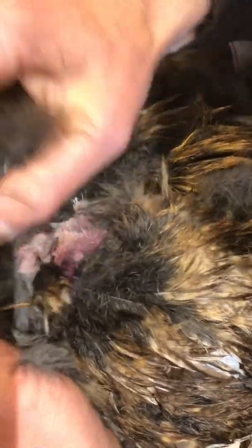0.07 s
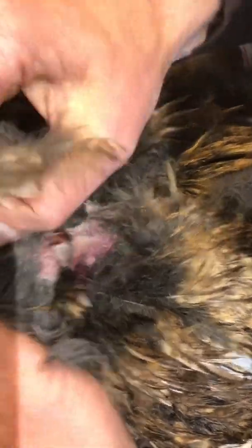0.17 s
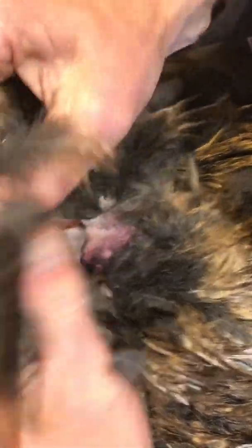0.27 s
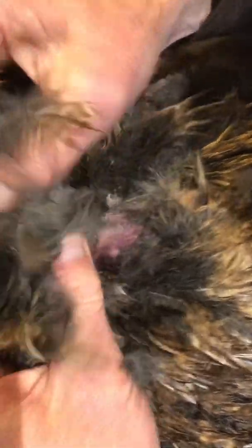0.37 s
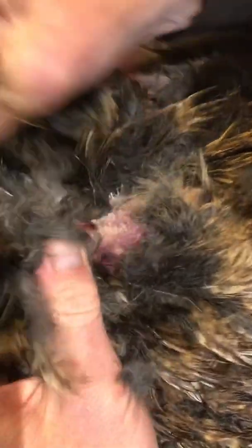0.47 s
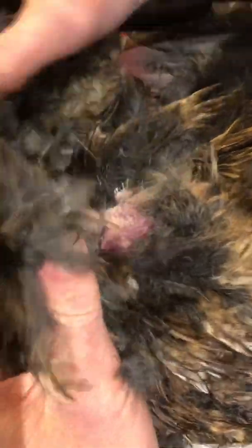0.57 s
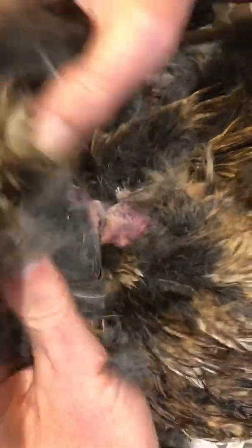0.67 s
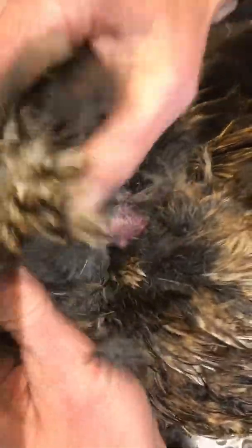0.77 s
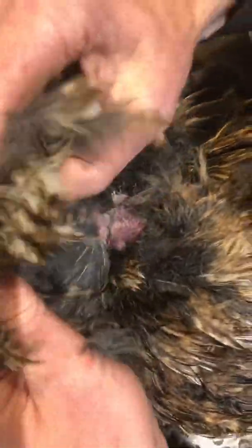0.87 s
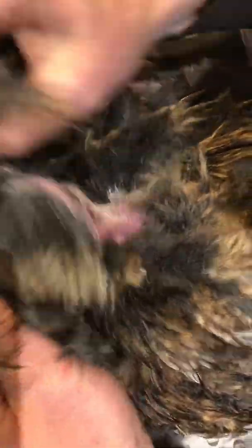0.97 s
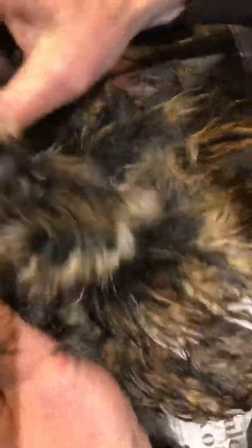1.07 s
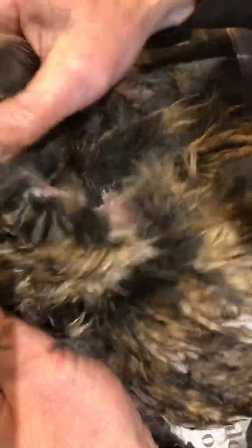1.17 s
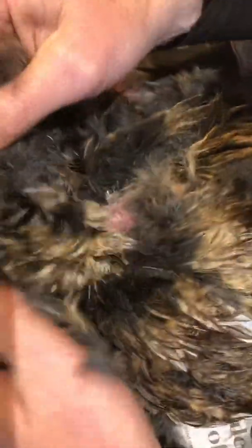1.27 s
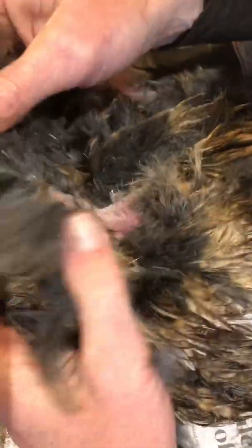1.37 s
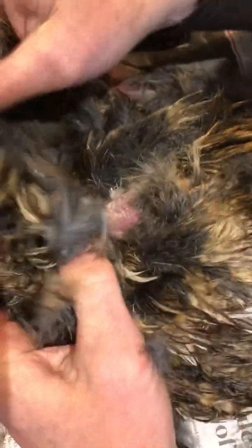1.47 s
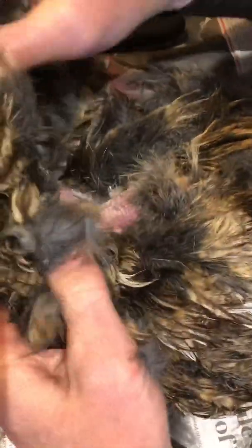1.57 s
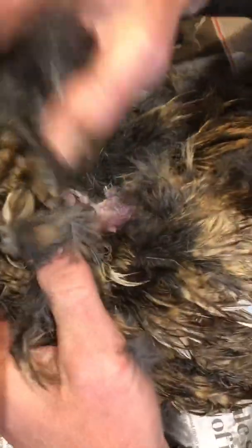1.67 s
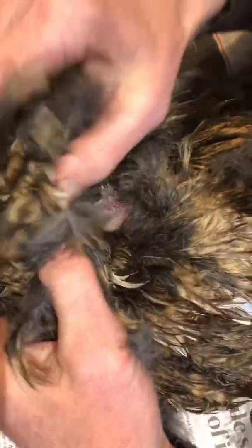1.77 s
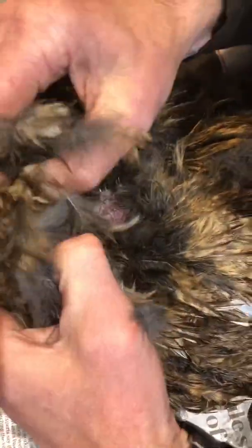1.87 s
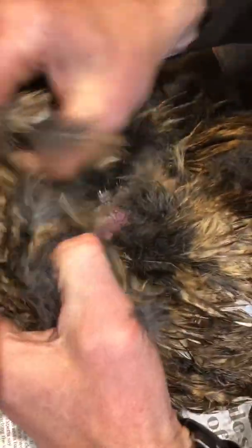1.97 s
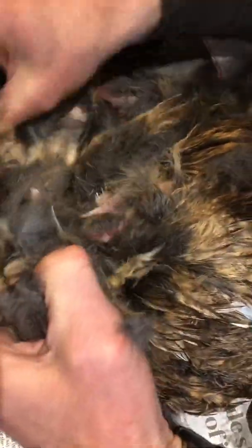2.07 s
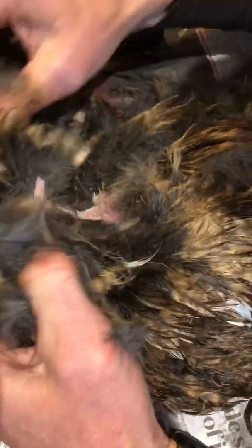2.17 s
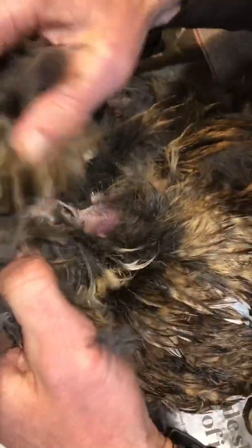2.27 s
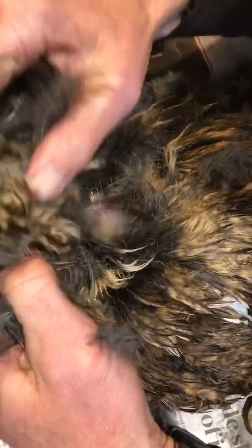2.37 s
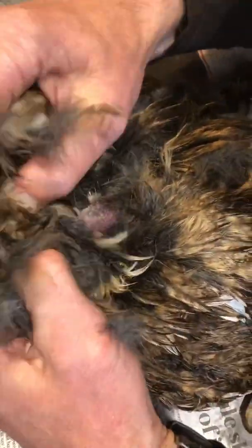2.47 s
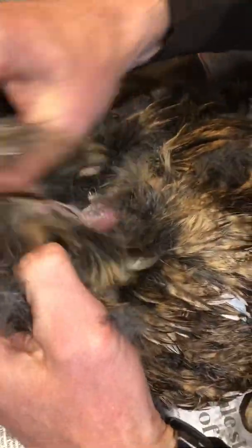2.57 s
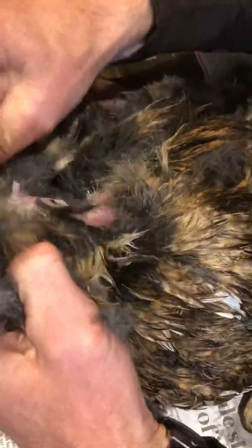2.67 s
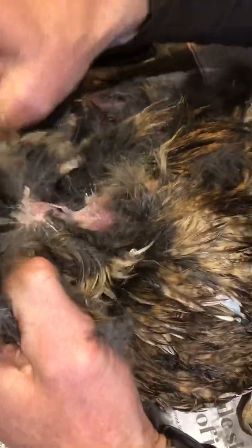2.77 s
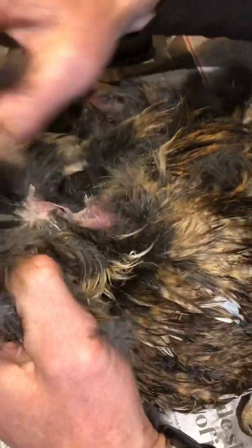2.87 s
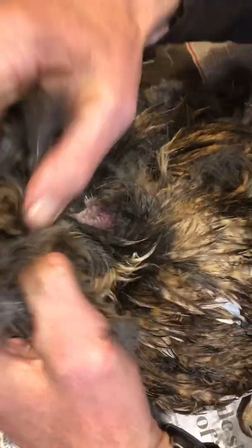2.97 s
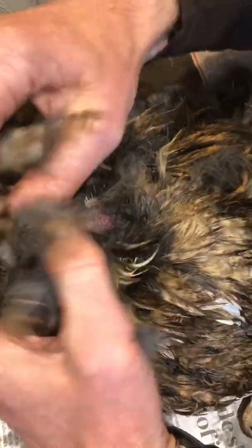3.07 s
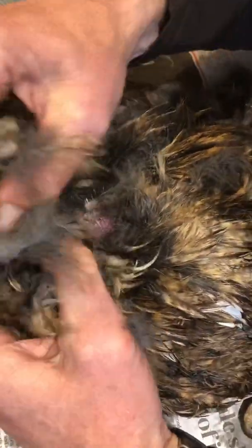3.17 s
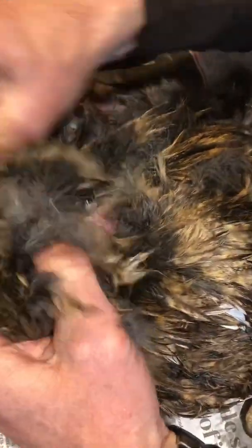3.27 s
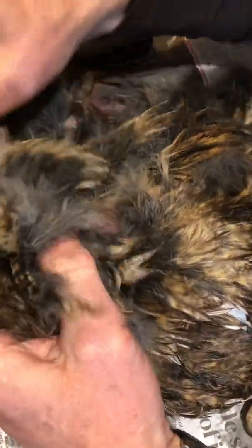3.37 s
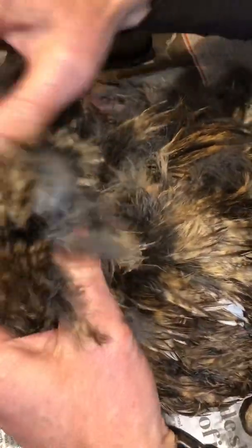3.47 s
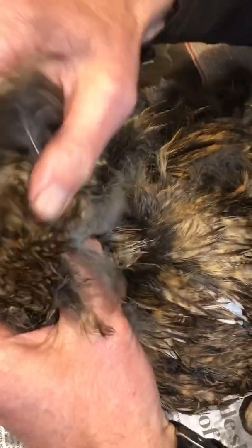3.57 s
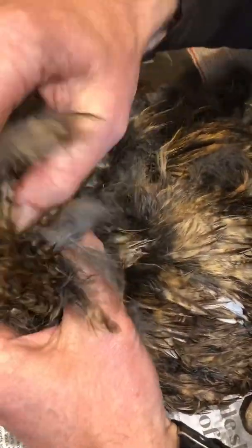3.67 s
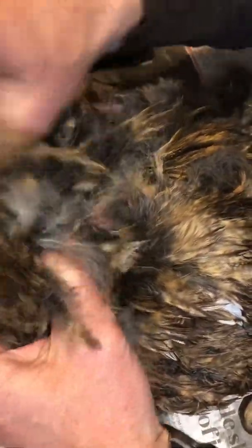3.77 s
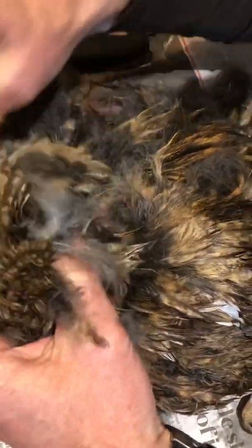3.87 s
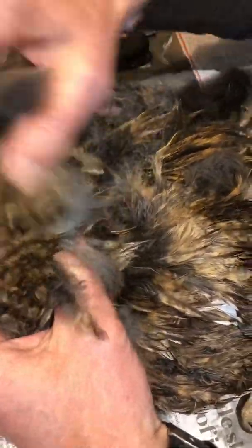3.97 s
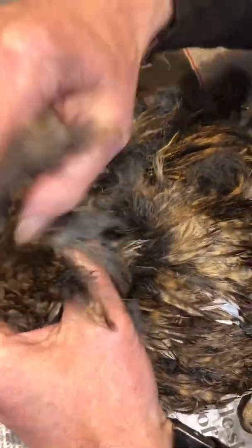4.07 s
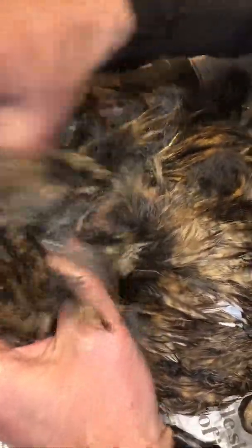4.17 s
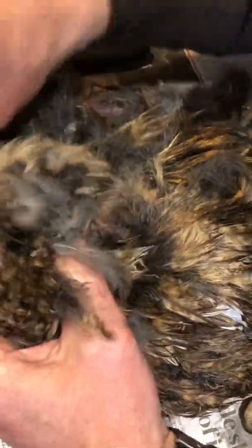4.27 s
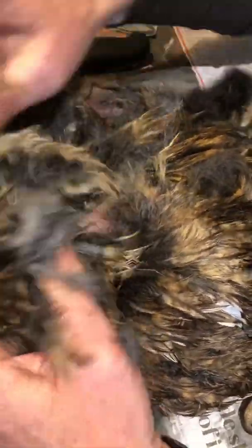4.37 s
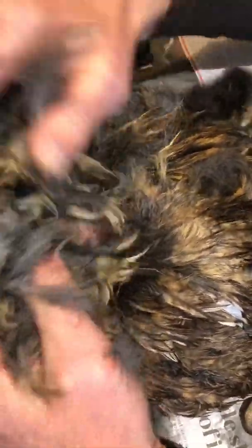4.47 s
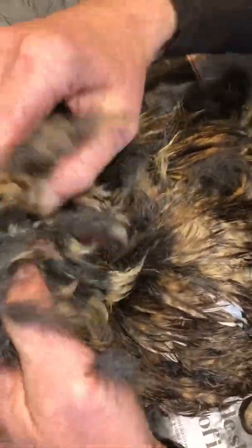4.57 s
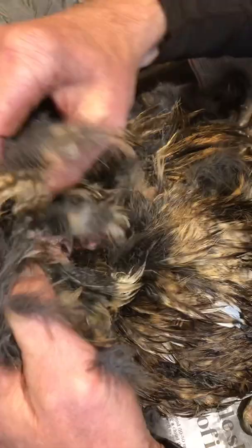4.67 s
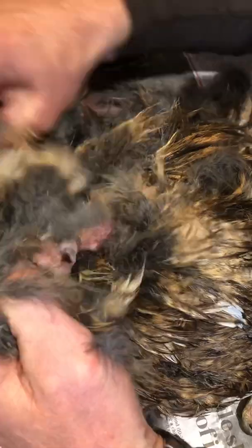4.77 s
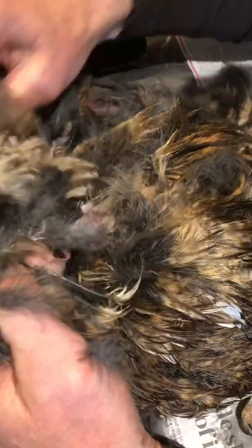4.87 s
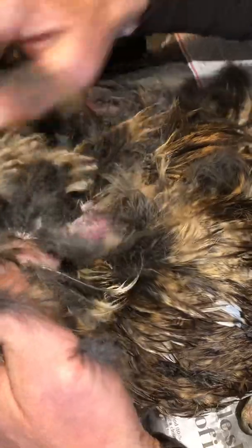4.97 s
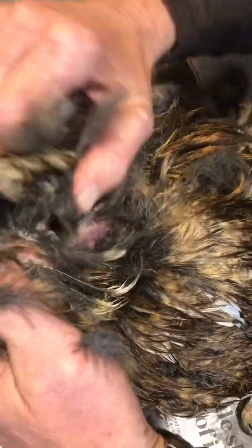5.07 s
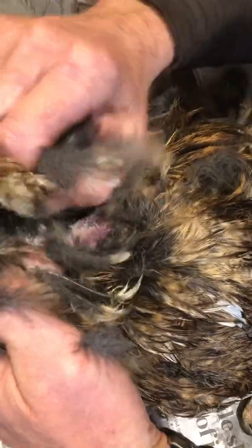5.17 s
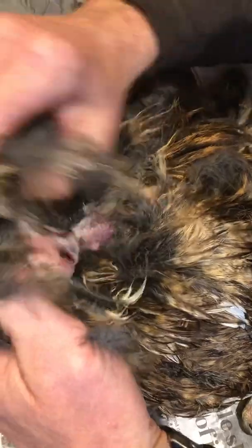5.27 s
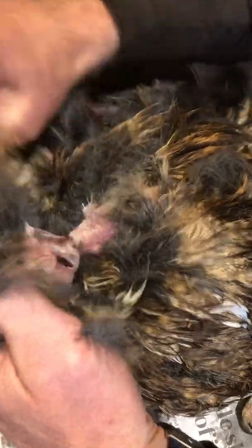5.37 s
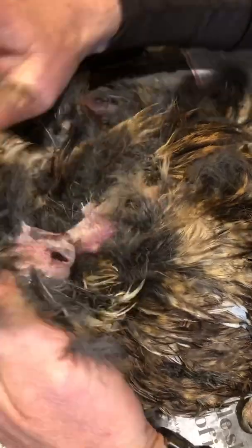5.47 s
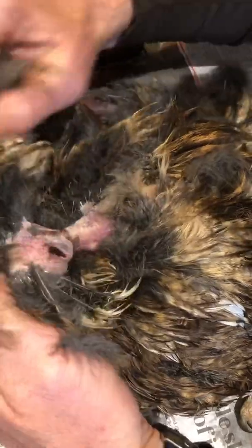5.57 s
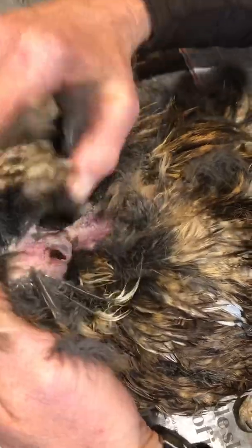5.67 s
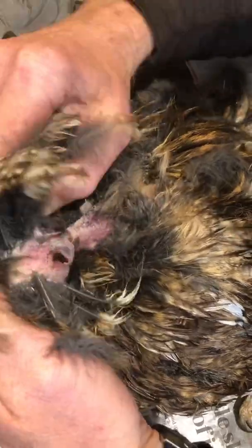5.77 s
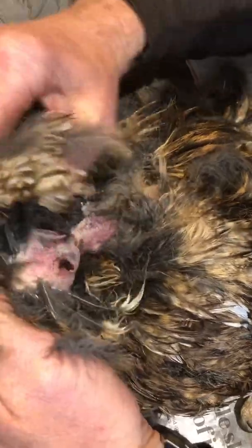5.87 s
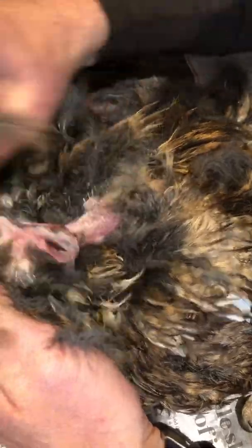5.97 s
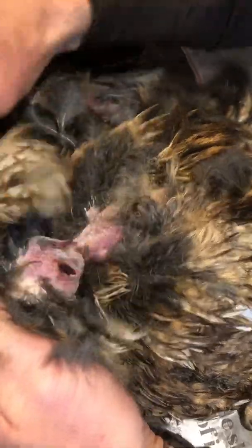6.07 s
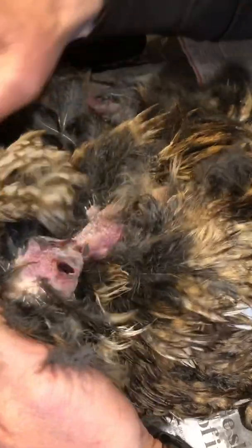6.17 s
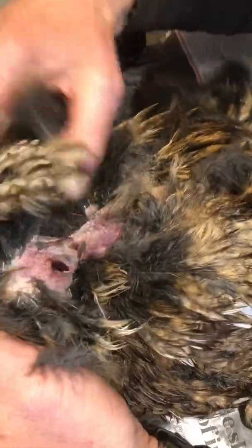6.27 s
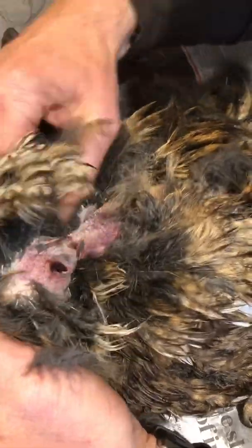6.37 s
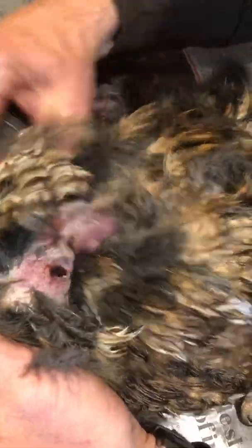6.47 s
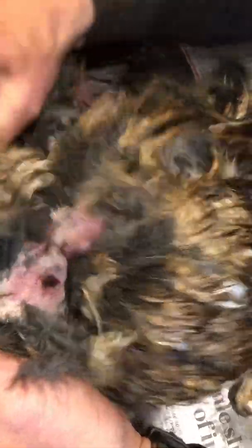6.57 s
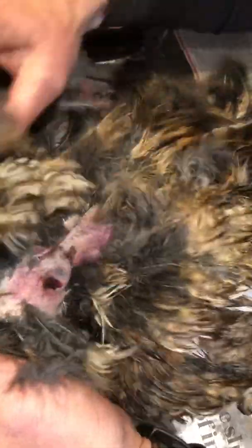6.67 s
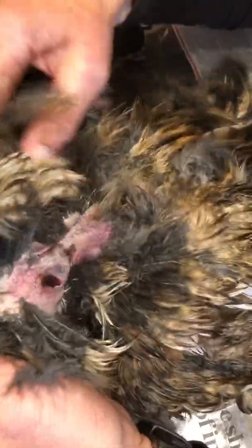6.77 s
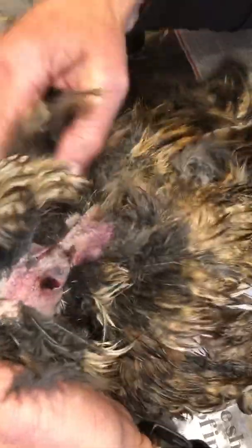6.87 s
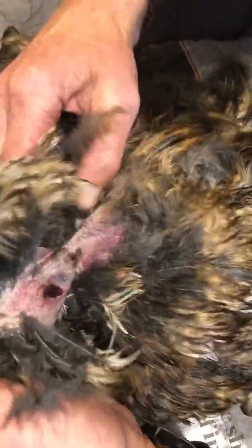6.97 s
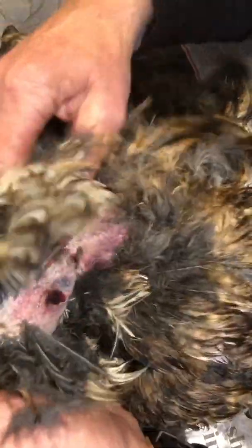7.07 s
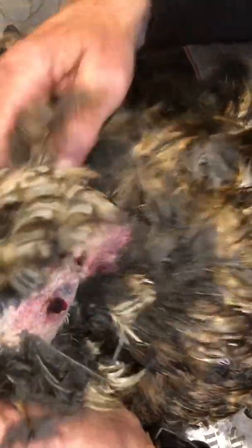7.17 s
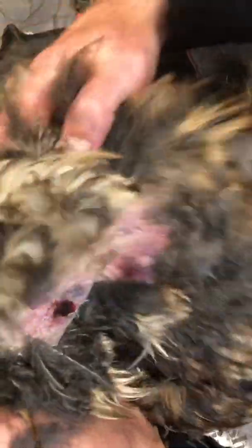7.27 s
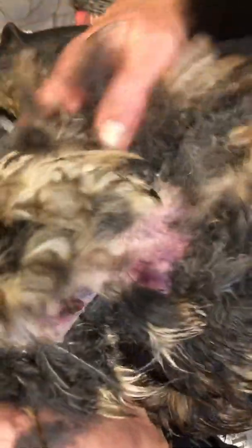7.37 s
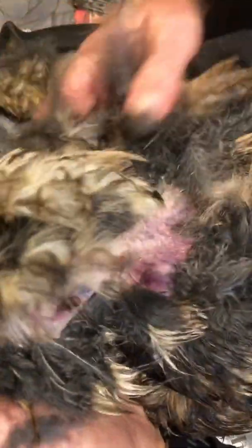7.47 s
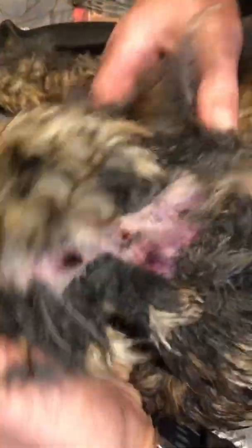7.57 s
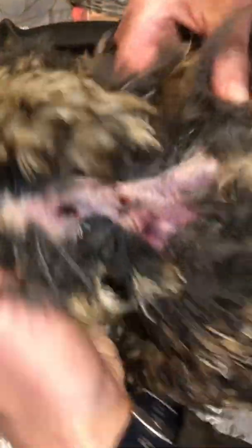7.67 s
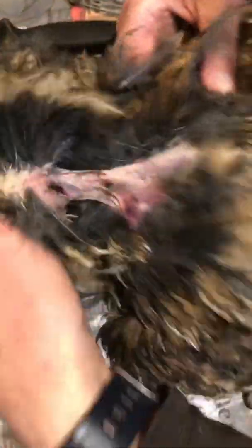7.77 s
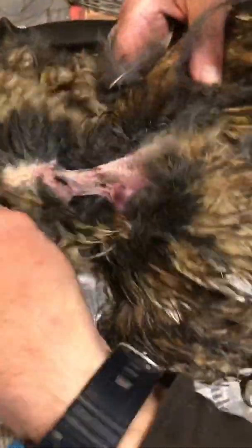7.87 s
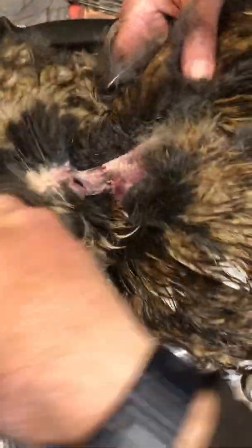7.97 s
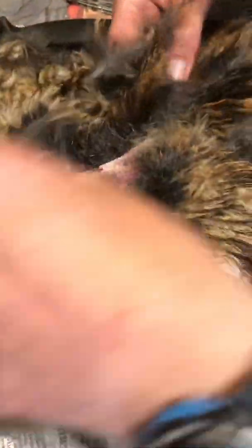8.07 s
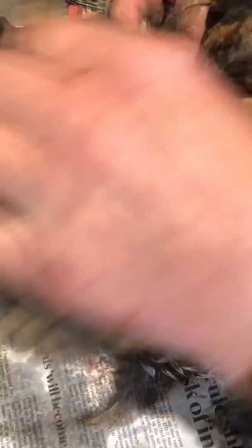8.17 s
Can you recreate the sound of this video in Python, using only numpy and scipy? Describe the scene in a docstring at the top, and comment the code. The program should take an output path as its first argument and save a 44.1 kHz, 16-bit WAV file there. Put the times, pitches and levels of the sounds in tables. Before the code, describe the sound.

Close to the microphone in a small quiet room, fingers rustle through a bird's plumage. Short irregular tugs tear feathers loose with clusters of damped pops, dry snaps and fine crackling down, each with a brief room reflection. Soft bumps come from the surface underneath. The strong pulls thin out after six seconds, the rustling grows fuller, and one dull, low thump lands just before the end.

```python
"""Small quiet room, close by: feathers are plucked by hand from a bird lying on newspaper.
From the start, shaped noise makes air, drone and rumble, and fingers rustle through plumage as patchy noise.
Soon come the tugs: volleys of damped quill pops and snaps, crackling down, dry shaft ticks and a short room answer.
Later the bird nudges the surface, ringing its modes, and near the end it is set down with one dull thump."""
import sys
import numpy as np
from scipy import signal
from scipy.fft import rfft, irfft, next_fast_len
from scipy.io import wavfile
from scipy.ndimage import uniform_filter1d, map_coordinates

SR = 44100
rng = np.random.default_rng(int(sys.argv[2]) if len(sys.argv) > 2 else 0)


def transcribe(u):
    """Save the signal u as a 16-bit wav file named by the first command-line argument.

    u: samples, shape (n,) or (channels, n), limited to [-1, 1]; the rate is SR.
    q: integer samples, one column per channel.
    """
    v = np.clip(np.atleast_2d(u).T, -1, 1)
    q = np.round(v * 32767).astype(np.int16)
    wavfile.write(sys.argv[1], SR, q)


N = 362061
TIME = np.arange(N) / SR
TOP_HZ = 16200  # the recorder's band limit

# All levels in the tables are relative; each source sets its final balance.
# Still air of the quiet room. Each row: frequency in Hz, density in dB per Hz.
AIR_SPECTRUM = [(30, -18.5), (60, 4.5), (290, -9), (400, -15), (800, -15), (1200, -17.5), (2000, -12.5),
                (3000, -23), (5000, -21.5), (7500, -26.5), (10000, -29.5), (16000, -55)]
# Faint low drone. Each row: frequency in Hz, density in dB per Hz.
DRONE_SPECTRUM = [(40, -13.5), (105, 3.5), (180, 1.5), (235, 0), (290, 1.5), (400, -15), (900, -35)]
# Deep rumble. Each row: frequency in Hz, density in dB per Hz.
RUMBLE_SPECTRUM = [(15, -48), (28, 4), (36, 11.5), (43, 9), (60, -14), (100, -37)]
# The rumble swells as each pull ends and then dies away.
RUMBLE_ATTACK_S, RUMBLE_HOLD_S, RUMBLE_RELEASE_S, RESTING_RUMBLE_DB = 0.032, 0.092, 0.13, -70

# Fingers stroking through the plumage. Each row: start in seconds, length in seconds, rubbing level in dB,
# its lean to the treble in dB, barb fizz level in dB, its lean to soft down in dB.
STROKES = [(0.0, 0.063, -61, 0.5, -70, -1), (0.128, 0.15, -64.5, -0.5, -65.5, 3.5),
           (0.634, 0.4, -72.5, 10, -67, 3.5), (0.911, 0.62, -63, 3.5, -70, 1.5),
           (1.605, 0.17, -64.5, 2.5, -65.5, 4.5), (1.98, 0.043, -58.5, 6.5, -78, -9),
           (2.658, 0.065, -66, 4.5, -68, 2), (2.855, 0.47, -72, -1.5, -77, 3),
           (3.329, 0.12, -74, -6.5, -65, 4), (3.738, 0.41, -90, 0, -70.5, 3),
           (4.2, 0.06, -66, 3, -65, -0.5), (4.718, 0.15, -61, -3, -68, -0.5),
           (4.945, 0.31, -72, -1.5, -74, 3.5), (5.313, 0.036, -64.5, 0, -65, -0.5),
           (5.48, 0.26, -63.5, -0.5, -79.5, -5), (5.794, 0.34, -64.5, 0.5, -71, -0.5),
           (6.396, 0.14, -63.5, 2, -67.5, -2), (6.678, 0.3, -69.5, -1.5, -67, 0),
           (7.07, 0.14, -61.5, 2.5, -60.5, 1), (7.278, 0.087, -65.5, -3.5, -76, -5),
           (7.43, 0.12, -60, -1, -60, 1), (7.66, 0.044, -65.5, -3.5, -66, 0),
           (7.741, 0.18, -58.5, -0.5, -58.5, 0), (7.996, 0.18, -57.5, 3.5, -61.5, -0.5)]
STROKE_ATTACK_S, STROKE_RELEASE_S = 0.038, 0.063
STROKE_ARCH_DB = 2.5  # a stroke presses this much harder in its middle than at its ends
RESTING_RUB_DB, RESTING_FIZZ_DB = -75.5, -77.5  # the holding hand never lies quite still
# Fingers rubbing over vanes. Each row: frequency in Hz, density in dB per Hz.
RUB_SPECTRUM = [(180, -47), (300, 0), (415, -4), (787, -4.5), (1180, -9), (1320, -8), (2460, -14.5),
                (4000, -26), (5200, -24), (8800, -120)]
# Barbs flicking past each other. Each row: frequency in Hz, density in dB per Hz.
BARB_SPECTRUM = [(1500, 0), (2500, 1), (3200, -0.5), (4200, 3.5), (6000, -0.5), (7200, 1), (8300, -4),
                 (10500, -7.5), (13000, -9.5), (16000, -14)]

# Each pull of the hand. Each row: start in seconds, length in seconds, small quills level in dB,
# tearing down level in dB, last rip level in dB, rumble level in dB.
TUGS = [(0.298, 0.047, -57, -54, -72, -78), (0.372, 0.01, -57, -61, -44, -79),
        (0.872, 0.028, -57, -69, -72, -78), (1.918, 0.022, -48.5, -39.5, -55, -59),
        (2.073, 0.017, -60, -63, -87, -78), (2.481, 0.041, -38, -43, -61, -68),
        (3.147, 0.041, -45, -49.5, -43, -59), (3.648, 0.052, -56, -52, -59.5, -68),
        (4.071, .029, -43.5, -44.5, -40, -54), (4.62, 0.041, -58, -56.5, -57, -58),
        (5.204, 0.072, -52.5, -53, -71, -59), (5.852, 0.052, -53.5, -61.5, -57, -58.5),
        (6.416, 0.032, -59, -50.5, -58, -64)]
# The big quills, each heard as a pop of its own. Each row: time in seconds, skin pop level in dB,
# nominal pop pitch in Hz, flesh level below 1 kHz in dB, quill snap level in dB.
BIG_QUILLS = [(0.3666, -37, 1810, -42, -46), (0.3717, -37, 1410, -46, -49), (0.38, -30, 1580, -33, -33),
              (0.5143, -47.5, 1900, -51, -60), (0.889, -41.5, 1980, -49, -47),
              (0.9111, -24.5, 1660, -23.5, -37.5), (1.8076, -52, 1470, -56, -69),
              (1.8975, -36, 1450, -43, -50.5), (1.9268, -38.5, 1470, -37, -56),
              (1.9312, -29, 1480, -38, -32), (2.0773, -46, 1980, -67, -54), (2.4813, -33, 1650, -57, -33.5),
              (2.4925, -29, 1440, -40, -49), (2.5044, -47, 1670, -48, -50), (2.5133, -28, 1790, -50, -36),
              (2.5196, -29, 1630, -37, -32), (2.5349, -32, 1130, -31, -42), (2.5473, -38.5, 1460, -37, -43),
              (3.1426, -41, 1780, -57, -40.5), (3.1548, -34, 1610, -32, -30.5),
              (3.1769, -41, 1720, -50, -50), (3.1849, -30.5, 1420, -47, -35.5),
              (3.1958, -28, 1560, -29.5, -29.5), (3.6792, -37.5, 1800, -39.5, -39),
              (4.0601, -34.5, 1550, -47, -34), (4.0702, -26, 1960, -44, -31.5),
              (4.0733, -46, 1500, -44, -27.5), (4.079, -39, 1850, -36, -31),
              (4.0835, -34, 1820, -33.5, -32), (4.097, -33.5, 1580, -43, -33),
              (4.6328, -45, 2210, -67, -50), (5.221, -39, 1900, -39, -46), (5.237, -42.5, 1520, -35, -64),
              (5.2622, -34.5, 1300, -38, -43), (5.5261, -48.5, 1350, -56, -59),
              (5.8551, -37, 1850, -39.5, -48), (5.8813, -37, 1470, -38.5, -51),
              (6.427, -33, 1200, -37.5, -45), (7.1017, -50.5, 1600, -56, -53),
              (7.438, -50.5, 1490, -65, -59), (7.5903, -52, 1640, -48, -66),
              (7.9871, -49, 1770, -55, -51.5)]
# A small quill: nominal pitch, its scatter, flesh and snap against the skin pop, scatter of level.
POP_HZ, POP_OCTAVES, FLESH_DB, SNAP_DB, SCATTER_DB = 1680, 0.39, -10, -5.5, 4.5
# A snapping quill. Each row: frequency in Hz, density in dB per Hz.
SNAP_SPECTRUM = [(300, -35.5), (1500, -5.5), (2300, 4.5), (2900, -21.5), (3700, 0.5), (4600, 0),
                 (6000, -1.5), (7000, -10.5), (8200, -7.5), (10500, -19), (15500, -24.5)]
# Tearing down. Each row: frequency in Hz, density in dB per Hz.
TEAR_SPECTRUM = [(150, 3), (600, 3.5), (1700, 9.5), (2300, 5.0), (2900, -7.5), (4400, 6),
                 (6000, 0), (7500, -5.0), (15000, -19.5)]
# Dry ticks of stiff shafts flicking past the fingers. Each row: time in seconds, level in dB.
TICKS = [(0.303, -52), (1.1255, -52.5), (3.1264, -47.5), (5.4663, -53.5), (5.6433, -60.5), (7.0636, -51),
         (7.6396, -53.5), (7.6765, -46.5)]

# Fading of the room's tail. Each row: frequency in Hz, time to fall 60 dB in seconds.
ROOM_DECAY = [(200, 0.32), (600, 0.25), (1500, 0.31), (4000, 0.33), (10000, 0.28), (16000, 0.19)]
# Colour of the room's answer. Each row: frequency in Hz, gain in dB.
WALL_COLOUR = [(200, 11), (700, 4.5), (1500, -2.5), (2800, 1), (4800, -2.5), (8000, -0.5), (12000, 3)]

# Soft blows on the surface. Each row: time in seconds, level in dB, centre of the push in Hz.
THUMPS = [(1.285, -40, 178), (1.931, -44, 278), (2.518, -47.5, 148), (3.19, -69, 150), (4.691, -54.5, 110),
          (5.291, -53, 100), (5.463, -48.5, 159), (6.755, -42.5, 288), (6.851, -50.5, 190),
          (7.064, -42.5, 212), (7.265, -46.5, 453), (7.285, -46.5, 108), (7.678, -43, 292),
          (7.753, -19, 170)]
# Modes of the surface with its load. Each row: frequency in Hz, level in dB, time to fall 60 dB in seconds.
SURFACE_MODES = [(35.2, -12, 1.4), (108, -2, 0.3), (120.8, -2.5, 0.52), (130.2, -7.5, 0.52),
                 (175.3, -5, 0.42), (187, -7, 0.43), (237.7, -4, 0.164), (278, -4.5, 0.23),
                 (301, -20.5, 1.07), (357, -9, 0.27)]


def amp(db):
    """Decibels to gain."""
    return 10 ** (np.asarray(db) / 20)


def unit(x):
    """Scale to rms 1."""
    return x / np.sqrt(np.mean(x ** 2) + 1e-20)


def along(points, hz):
    """Read (Hz, value) points on a log frequency axis."""
    f, v = np.transpose(points)
    return np.interp(np.log(hz + 1), np.log(f + 1), v)


def wobble(rate):
    """A smooth random curve with rate knots a second."""
    knots = rng.standard_normal(int(N * rate / SR) + 4)
    return map_coordinates(knots, [TIME * rate])


def add(track, s, sound):
    """Mix a sound into the track at time s."""
    part = track[max(round(s * SR), 0):][:len(sound)]
    part += sound[:len(part)]


def filtered(x, response):
    """Multiply the spectrum of x by a response of frequency."""
    m = next_fast_len(N + SR // 4)
    return irfft(rfft(x, m) * response(np.fft.rfftfreq(m, 1 / SR)), m)[:N]


def coloured(x, spectrum):
    """Shape x by the given spectrum, at rms 1."""
    return unit(filtered(x, lambda hz: amp(along(spectrum, hz))))


def lowpassed(x, edge_hz):
    """Dull x above edge_hz."""
    return signal.sosfilt(signal.butter(4, edge_hz, fs=SR, output="sos"), x)


def sized(x):
    """Scale a short sound so that its energy equals rms 1 over 2 ms."""
    return x * np.sqrt(.002 * SR / np.sum(x ** 2))


def impulse(spectrum, size=1024):
    """The causal minimum-phase click that has the given spectrum."""
    cepstrum = irfft(np.log(amp(along(spectrum, np.fft.rfftfreq(size, 1 / SR)))))
    cepstrum[1:size // 2] *= 2
    cepstrum[size // 2 + 1:] = 0
    return irfft(np.exp(rfft(cepstrum)))


def grains(rate, spread_db):
    """Tiny random clicks of uneven size, rate a second on average, at rms 1."""
    sizes = amp(spread_db * np.clip(rng.standard_normal(N), -2, 2))
    signs = rng.choice([-1, 1], N)
    return unit(sizes * signs * (rng.random(N) < rate / SR))


def envelope(s, hold_s, attack_s, release_s):
    """Rise to 1 at time s, hold, and fall away."""
    rise = (np.maximum(s - TIME, 0) / attack_s) ** 2
    fall = np.maximum(TIME - s - hold_s, 0) / release_s
    return np.exp(-rise - fall)


def background():
    """Still room air and a faint low drone as shaped noise, with a rumble that swells as each pull ends."""
    power = amp(RESTING_RUMBLE_DB) ** 2
    for s, length, *_, db in TUGS:
        swell = amp(db) * envelope(s + length, RUMBLE_HOLD_S, RUMBLE_ATTACK_S, RUMBLE_RELEASE_S)
        power = power + swell ** 2
    rumble = np.sqrt(power) * coloured(rng.standard_normal(N), RUMBLE_SPECTRUM)
    air = amp(-68.0) * coloured(rng.standard_normal(N), AIR_SPECTRUM)
    waver_db = 1.8 * wobble(6)
    drone = amp(-68.5 + waver_db) * coloured(rng.standard_normal(N), DRONE_SPECTRUM)
    return air + drone + rumble


def patchy(x, depth_db, size=512):
    """Give x patches of random gain, a few hundred Hz wide and some 25 ms long, at rms 1."""
    z = signal.stft(x, nperseg=size)[2]
    field = uniform_filter1d(rng.standard_normal(z.shape), size=5, axis=0)
    field = uniform_filter1d(field, size=4, axis=1)
    return unit(signal.istft(z * amp(depth_db * unit(field)), nperseg=size)[1][:N])


def stroked(sound, levels_db, leans_db, resting_db, split_hz, wander_db):
    """Swell with each stroke, which has its own balance about split_hz; wander_db sets how far that drifts."""
    high = filtered(sound, lambda hz: 1 / (1 + (split_hz / (hz + 1)) ** 6))
    low_power = high_power = amp(resting_db) ** 2
    for (s, length, *_), db, lean_db in zip(STROKES, levels_db, leans_db):
        arch_db = STROKE_ARCH_DB * (np.sin(np.pi * np.clip((TIME - s) / length, 0, 1)) - .5)
        touch = (amp(arch_db) * envelope(s, length, STROKE_ATTACK_S, STROKE_RELEASE_S)) ** 2
        low_power = low_power + amp(db - lean_db) ** 2 * touch
        high_power = high_power + amp(db + lean_db) ** 2 * touch
    wander = amp(wander_db * wobble(11))
    return np.sqrt(high_power) * high * wander + np.sqrt(low_power) * (sound - high) / wander


def plumage(rub_level_db=-2.5, fizz_level_db=-0.55):
    """In each stroke the fingers rub over the vanes while the barbs flick past each other."""
    _, _, rub_db, treble_db, fizz_db, down_db = np.transpose(STROKES)
    pressure_db = 1.5 * wobble(30)
    # vanes scrape in bands of their own for a moment
    rub = rng.standard_normal(N) + .7 * grains(rate=400, spread_db=5)
    rub = patchy(coloured(rub, RUB_SPECTRUM), depth_db=3.0)
    rub = stroked(rub, rub_db + rub_level_db, treble_db, RESTING_RUB_DB, split_hz=1400, wander_db=1.86)
    # soft down hisses higher than stiff vanes; each stroke has its own balance of the two
    fizz = rng.standard_normal(N) + .6 * grains(rate=1500, spread_db=5)
    fizz = patchy(coloured(fizz, BARB_SPECTRUM), depth_db=2.6)
    fizz = stroked(fizz, fizz_db + fizz_level_db, down_db, RESTING_FIZZ_DB, split_hz=6500, wander_db=-0.1)
    return amp(pressure_db) * (rub + fizz)


def small_quills(start_s, length_s, db, count):
    """Rows like those of BIG_QUILLS for small quills that go one after another at uneven gaps."""
    times = start_s + length_s * (np.arange(count) + rng.random(count)) / count
    size, pitch, flesh, snap = rng.standard_normal((count, 4)).T
    skin_db = db + SCATTER_DB * np.clip(size, -1.5, 1.5)
    pop_hz = POP_HZ * 2 ** (POP_OCTAVES * pitch)
    flesh_db = skin_db + FLESH_DB + SCATTER_DB * flesh
    snap_db = skin_db + SNAP_DB + SCATTER_DB * snap
    return list(zip(times, skin_db, pop_hz, flesh_db, snap_db))


def all_quills():
    """The big quills, a volley of small ones in every pull, and a few faint strays in every stroke."""
    rows = list(BIG_QUILLS)
    for s, length, db, *_ in TUGS:
        rows += small_quills(s, length, db, count=7)
    for s, length, _, _, fizz_db, _ in STROKES:
        rows += small_quills(s, length, fizz_db, count=3)
    return rows


def quills(pop_t60=0.0044, slack_s=0.0019, flesh_t60=0.0058, flesh_edge_hz=1000, skin_edge_hz=2700,
           snap_t60=0.0068, first_slip=3.7, low_db=-6.0, snap_db=2.26, size=600):
    """Each quill snaps free in tiny slips, and the stretched skin and flesh spring back with a damped pop."""
    out, t = np.zeros(N), np.arange(size) / SR
    shaft = impulse(SNAP_SPECTRUM)
    for s, skin_db, hz, flesh_db, quill_db in all_quills():
        # each quill has its own decay and slackening times
        damping, slack = np.exp(0.56 * rng.standard_normal(2))
        skin = np.cos(2 * np.pi * 0.99 * hz * t) * amp(-60 * t / (pop_t60 * damping))
        skin = sized(lowpassed(skin, skin_edge_hz))
        # the flesh under it goes slack, so its pitch drops within a few milliseconds
        turns = np.cumsum(380 + 0.74 * hz * np.exp(-t / (slack_s * slack))) / SR
        flesh = np.cos(2 * np.pi * turns) * amp(-60 * t / flesh_t60)
        flesh = sized(lowpassed(flesh, flesh_edge_hz))
        slips = rng.standard_normal(size) * amp(-60 * t / (snap_t60 * damping))
        slips[0] += first_slip
        snap = sized(np.convolve(slips, shaft)[:size])
        pop = amp(skin_db) * skin + amp(flesh_db + low_db) * flesh
        add(out, s, pop + amp(quill_db + snap_db) * snap)
    return out


def room(x, walls_db=-7, count=24):
    """Near walls and a short diffuse tail, redrawn every third of a second."""
    out, block = np.zeros(N), SR // 3
    for start in range(0, N, block):
        hz, t, z = signal.stft(rng.standard_normal(SR // 2), SR, nperseg=256)
        fade = amp(-60 * t / along(ROOM_DECAY, hz)[:, None])
        tail = signal.istft(z * fade, SR, nperseg=256)[1]
        tail /= np.linalg.norm(tail)
        # near-wall reflections lie in the first 16 ms of the tail
        arrivals = (rng.random(count) * .016 * SR).astype(int)
        tail[arrivals] += amp(walls_db) * rng.choice([-1, 1], count) / np.sqrt(count)
        add(out, start / SR + .003, signal.fftconvolve(x[start:start + block], tail))
    return filtered(out, lambda hz: amp(along(WALL_COLOUR, hz)))


def bell(centre_s, half_s):
    """A smooth swell about centre_s."""
    return np.exp(-.5 * ((TIME - centre_s) / half_s) ** 2)


def tufts(width_share=0.26, rip_s=0.0068, tear_fray_db=2, rip_fray_db=11):
    """Fine down tears as a dense crackle through each pull, and its last fibres part in a short bright rip."""
    crackle = coloured(grains(rate=2500, spread_db=3.5), TEAR_SPECTRUM)
    # the fray is the crackle's treble, above about 8 kHz
    fray = filtered(crackle, lambda hz: 1 / (1 + (8000 / (hz + 1)) ** 8))
    tearing, ripping = np.zeros(N), np.zeros(N)
    for s, length, _, tear_db, rip_db, _ in TUGS:
        tearing += amp(tear_db) * bell(s + length / 2, width_share * length)
        ripping += amp(rip_db) * bell(s + length, rip_s)
    fray_gain = amp(tear_fray_db) * tearing + amp(rip_fray_db) * ripping
    return (tearing + ripping) * (crackle - fray) + fray_gain * fray


def ticks(t60=0.0034, first_slip=2.0, size=600):
    """A shaft flicks free without pulling on the skin, so only its snap is heard."""
    out, t, shaft = np.zeros(N), np.arange(size) / SR, impulse(SNAP_SPECTRUM)
    for s, db in TICKS:
        slips = rng.standard_normal(size) * amp(-60 * t / t60)
        slips[0] += first_slip
        add(out, s, amp(db) * sized(np.convolve(slips, shaft)[:size]))
    return out


def noise_band(low_hz, high_hz):
    """One second of noise between two frequencies, at rms 1."""
    sos = signal.butter(3, [low_hz, high_hz], "band", fs=SR, output="sos")
    return unit(signal.sosfilt(sos, rng.standard_normal(SR)))


def thumps(push_octaves=0.76, attack_s=0.00041, rise_cycles=0.34, thud_db=-12, thud_t60=0.43,
           knock_db=-24, knock_t60=0.11):
    """A soft blow rings the surface modes near its push, with a dead thud and a faint papery knock."""
    out, t = np.zeros(N), np.arange(SR) / SR
    hz, mode_db, t60 = np.transpose(SURFACE_MODES)[:, :, None]
    for s, db, push_hz in THUMPS:
        reach = np.exp(-.5 * (np.log2(hz / push_hz) / push_octaves) ** 2)
        reach = np.maximum(reach, 0.35 * (hz < 60))  # the deepest mode always answers
        phase = rng.uniform(0, 2 * np.pi, hz.shape)
        modes = amp(mode_db - 60 * t / t60) * np.sin(2 * np.pi * hz * t + phase)
        swell = 1 - np.exp(-t * hz / rise_cycles)  # low modes take longer to get going
        thud = noise_band(0.82 * push_hz, 1.325 * push_hz) * amp(thud_db - 60 * t / thud_t60)
        knock = noise_band(420, 1550) * amp(knock_db - 60 * t / knock_t60)
        ringing = np.sum(reach * modes * swell, 0)
        add(out, s, amp(db - 4) * (ringing + (thud + knock) * (1 - np.exp(-t / attack_s))))
    return out


def taps(tap_db=-12, tap_hz=750, tap_t60=0.006, edge_hz=1600):
    """The first contact of each blow is a short dull tap, a damped tone."""
    out, t = np.zeros(N), np.arange(SR // 20) / SR
    tap = lowpassed(np.cos(2 * np.pi * tap_hz * t) * amp(-60 * t / tap_t60), edge_hz)
    for s, db, _ in THUMPS:
        add(out, s, amp(db + tap_db) * tap / np.abs(tap).max())
    return out


def scene():
    """The plucking in its room, with rustle, thumps and background."""
    plucks = quills() + tufts() + ticks()
    answer = amp(-10.6) * room(plucks)
    return (background() + plumage() + plucks + answer + thumps() + taps())[None]


def record(dry):
    """The recorder keeps nothing above its band limit."""
    return filtered(dry[0], lambda hz: hz < TOP_HZ)[None]


dry = scene()
out = record(dry)
transcribe(out)
```